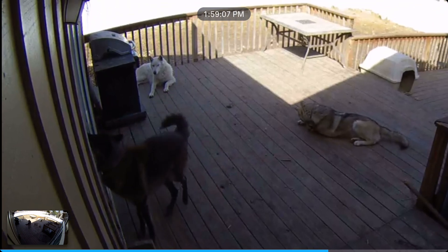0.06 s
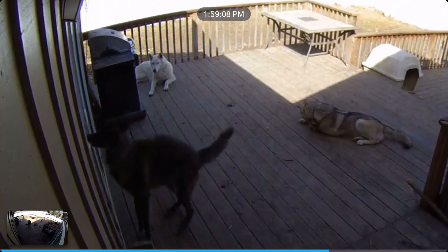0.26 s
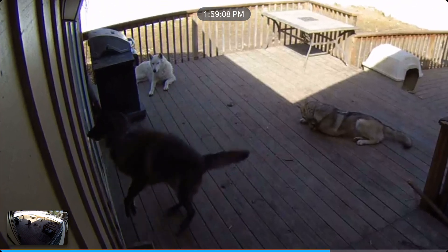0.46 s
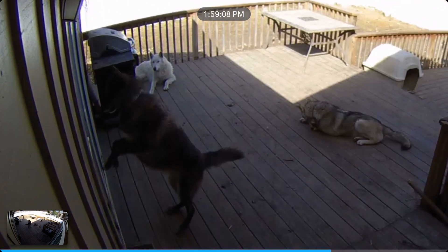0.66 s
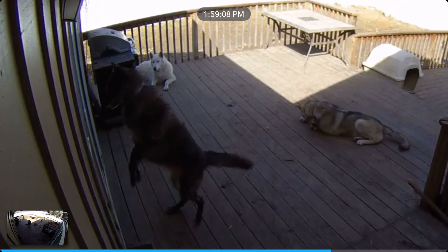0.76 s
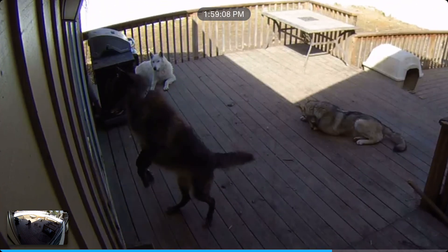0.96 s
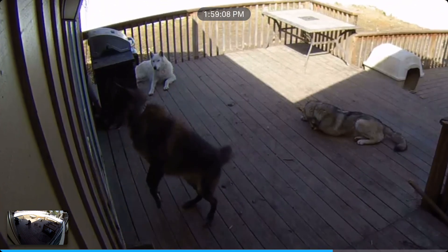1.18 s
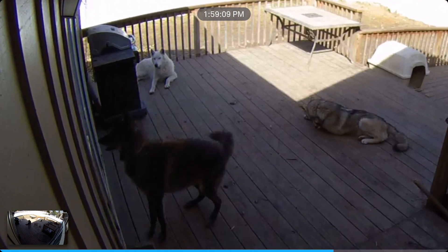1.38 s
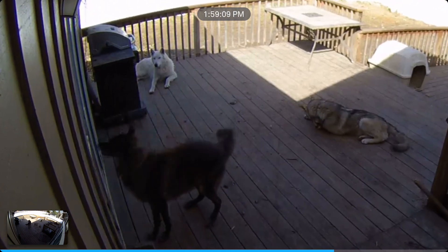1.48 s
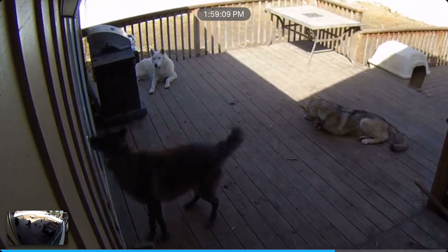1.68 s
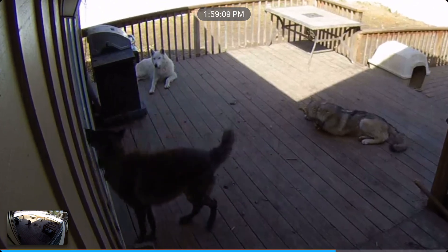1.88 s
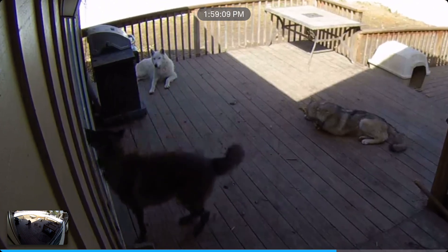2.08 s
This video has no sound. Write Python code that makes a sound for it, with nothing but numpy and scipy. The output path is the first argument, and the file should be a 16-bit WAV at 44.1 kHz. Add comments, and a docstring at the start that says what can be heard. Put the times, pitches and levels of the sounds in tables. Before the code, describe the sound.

Dog paws thump and claws click on a wooden deck, bumping and scratching a glass door.

```python
"""Paws knock on hollow wooden boards and claws tick: a dog on a deck rears up at a sliding glass door.
Three times a paw hits the door, which rattles in its frame. Claws drag over frame and glass and squeak
briefly, and the deck thumps as the dog drops back. The house wall gives a close echo, and a small,
dull microphone picks it all up over quiet outdoor air."""
import sys
import numpy as np
from scipy import signal
from scipy.fft import rfft, irfft, next_fast_len
from scipy.io import wavfile
from scipy.ndimage import uniform_filter1d

SR = 44100
rng = np.random.default_rng(int(sys.argv[2]) if len(sys.argv) > 2 else 0)


def file_out(sig):
    """Save sig as 16-bit WAV at sys.argv[1]."""
    # one column per channel
    cols = np.atleast_2d(sig).T
    # limit, then scale
    lim = np.clip(cols, -1, 1)
    pcm = np.round(lim * 32767).astype(np.int16)
    wavfile.write(sys.argv[1], SR, pcm)


N = 92610
T = np.arange(N) / SR
BLOW_SAMPLES = SR // 3   # room for one blow to die away


def from_db(db):
    """Turn decibels into a number to multiply by."""
    return 10 ** (np.asarray(db) / 20)


def add(out, start, sound):
    """Mix a sound in at a start time in seconds."""
    i = max(0, int(start * SR))
    out[i:i + len(sound)] += sound[:max(0, N - i)]


def colour(x, tone):
    """Make some frequencies louder and others softer, following a tone table."""
    size = 2 * next_fast_len(len(x))
    hz, db = np.transpose(tone)
    bin_hz = np.arange(size // 2 + 1) * SR / size
    log_gain = np.log(from_db(np.interp(np.log(bin_hz + 1), np.log(hz), db)))
    # a minimum-phase filter: nothing sounds before the blow that causes it
    cepstrum = irfft(log_gain)
    cepstrum[1:size // 2] *= 2
    cepstrum[size // 2 + 1:] = 0
    return irfft(rfft(x, size) * np.exp(rfft(cepstrum)))[:len(x)]


def dying(fade_s):
    """A smooth fade. Every fade time here is the time it takes to fall by 60 dB."""
    return np.exp(-np.log(1000) * T[:BLOW_SAMPLES] / fade_s)


def ring(hz, fade_s):
    """Something struck rings at one pitch and dies away."""
    return dying(fade_s) * np.sin(2 * np.pi * hz * T[:BLOW_SAMPLES])


def scatter(x, db, fade_s):
    """Follow a blow with its own cloud of chatter and close echoes."""
    cloud = rng.standard_normal(BLOW_SAMPLES) * dying(fade_s) * (1 - dying(0.017))
    return x + from_db(db) * signal.fftconvolve(x, cloud / np.linalg.norm(cloud))[:len(x)]


def at_level(x, db):
    """Scale a blow so that its loudest two milliseconds have this level."""
    return x * from_db(db) / np.sqrt(uniform_filter1d(x * x, size=88).max())


def porch(x, echo_db=-17, fade_s=0.53):
    """Sound lingers faintly as it bounces between wall, eaves and deck."""
    build_up = 1 - dying(0.08)[np.minimum(np.arange(N), BLOW_SAMPLES - 1)]
    tail = rng.standard_normal(N) * from_db(-60 * T / fade_s) * build_up
    return x + from_db(echo_db) * signal.fftconvolve(x, tail / np.linalg.norm(tail))[:N]


# tone of the outdoor air: (frequency [Hz], gain [dB])
AIR_TONE = [(18, -64.5), (30, -31.5), (182, -13), (257, -10), (339, -4), (408, -8.5), (551, -2.5),
            (727, -13.5), (855, -14), (1080, -26.5), (1710, -25.5), (2590, -18.5), (5060, -32), (5820, -35),
            (7500, -64), (9750, -81.5), (16500, -120)]
def air():
    """A quiet, steady outdoor hush."""
    noise = colour(rng.standard_normal(N), AIR_TONE)
    return from_db(-54.5) * noise / noise.std()


# tone of small, hard ticks on the boards: (frequency [Hz], gain [dB])
TICK_TONE = [(1000, -9.5), (2500, 2.5), (4500, -4), (5800, 6.5), (7000, -1.5), (8000, -24)]
def bright_ticks(clicks, cloud_db, fade_s):
    """Give clicks a short cloud of chatter and the bright sound of a claw on wood."""
    return colour(scatter(clicks, cloud_db, fade_s), TICK_TONE)


def shuffles(clicks_per_s=220):
    """Paws shifting on the gritty boards make tiny random ticks."""
    clicks = rng.random(N) < clicks_per_s / SR
    strength = from_db(6.5 * np.clip(rng.standard_normal(N), -2, 2))
    ticks = bright_ticks(clicks * strength, cloud_db=3, fade_s=0.027)
    return from_db(-72.5) * ticks / ticks.std()


# a claw catches on the glass: (time [s], length [s], pitch [Hz], level [dB])
GLASS_SQUEAKS = [(1.535, 0.0089, 2517, -34.5), (1.545, .026, 2566, -41.5), (1.555, 0.026, 3720, -45)]
def squeaks():
    """For a moment a claw's tiny slips on the glass lock into a wavering tone."""
    out = np.zeros(N)
    for start, length, hz, db in GLASS_SQUEAKS:
        t = T[:int(length * SR)]
        waver = uniform_filter1d(rng.standard_normal(BLOW_SAMPLES), size=60)
        pitch = hz * (1 + 0.039 * waver / waver.std())
        phase = 2 * np.pi * np.cumsum(pitch)[:len(t)] / SR
        swell = np.sin(np.pi * t / length)
        add(out, start, at_level(np.sin(phase) * swell, db))
    return out


# claws drag over the door: (time [s], length [s], relative level [dB])
CLAW_DRAGS = [(0.144, .04, -52.5), (0.351, 0.06, -53), (0.804, 0.047, -53), (0.886, 0.025, -50),
              (0.958, 0.051, -61), (1.154, 0.12, -58.5), (1.363, 0.057, -61.5), (1.487, 0.029, -47.5),
              (1.517, 0.036, -42.5), (1.572, 0.028, -51), (1.692, 0.027, -58), (1.769, 0.023, -55),
              (1.956, 0.057, -52)]
# notes the door frame rings at: (pitch [Hz], relative level [dB], fade time [s])
FRAME_NOTES = [(2170, -10.5, 0.087), (2533, -1.5, 0.026), (2670, 2, 0.031), (2930, -5, 0.048),
               (3770, -2, 0.03), (5750, -26.5, .012)]
# tone of the scraping: (frequency [Hz], gain [dB])
SCRAPE_TONE = [(800, 2.5), (1700, -6.5), (2500, 5.5), (3700, 5.5), (4400, 1.5), (5800, -7.5), (7500, -24)]
def scrapes(slips_per_s=4000, rise_s=0.0098, release_s=0.033):
    """A dragged claw sticks and slips in a stream of tiny clicks that make the frame sing."""
    slips = (rng.random(N) < slips_per_s / SR) * rng.choice([-1, 1], N)
    slips = slips * from_db(2 * rng.standard_normal(N))
    force = np.zeros(N)
    for start, length, db in CLAW_DRAGS:
        press = np.clip((T - start) / rise_s, 0, 1)
        ease_off = from_db(db - 7.5 * np.clip((T - start) / length, 0, 1))
        let_go = np.clip((start + length - T) / release_s + 1, 0, 1)
        force += press * ease_off * let_go
    frame = sum(from_db(db - 37) * ring(hz, fade_s) for hz, db, fade_s in FRAME_NOTES)
    frame[0] += 0.5   # the bare click, ahead of the ringing
    frame = colour(frame, SCRAPE_TONE)
    return from_db(4) * signal.fftconvolve(slips * force / slips.std(), frame / np.linalg.norm(frame))[:N]


# claw tips land: (time [s], relative level [dB], skid length [s])
CLAW_TICKS = [(0.081, -61, 0.0045), (.147, -64, 0.018), (0.234, -48, 0.0038), (0.263, -53, .006),
              (0.28, -58, 0.0028), (0.311, -52, 0.0046), (0.317, -60, 0.0043), (0.35, -58, .004),
              (0.367, -59.5, 0.028), (0.49, -55, 0.0065), (0.616, -52, 0.0074), (0.646, -59.5, 0.03),
              (0.712, -56, 0.0063), (0.749, -53.5, 0.0035), (0.7547, -47, 0.0048), (.786, -56, 0.0073),
              (0.798, -50.5, 0.0073), (0.811, -59, 0.018), (0.88, -54, 0.0067), (0.892, -56.5, 0.011),
              (0.95, -58.5, 0.019), (0.96, -52, 0.012), (.979, -55, 0.0048), (1.13, -78.5, 0.0027),
              (1.139, -63.5, 0.0072), (1.25, -60.5, 0.0053), (1.260, -60, 0.014), (1.326, -55, 0.00099),
              (1.366, -58.5, 0.0049), (1.401, -50, 0.0075), (1.414, -50, .003), (1.445, -58.5, 0.0068),
              (1.490, -44, 0.00072), (1.497, -51, 0.0065), (1.535, -58, 0.013), (1.585, -48, 0.0019),
              (1.589, -50.5, 0.0019), (1.603, -62, 0.0044), (1.691, -49.5, 0.002), (1.695, -47, 0.0032),
              (1.764, -62, 0.0089), (1.829, -43.5, 0.0024), (1.983, -63.5, 0.0032)]
def claws(rise_s=0.00086, release_s=0.0035, gain_db=3.04):
    """Each claw tip ticks as it lands and skids for a moment in gritty slips."""
    out, t = np.zeros(N), T[:BLOW_SAMPLES]
    for start, db, length in CLAW_TICKS:
        press = np.clip(t / rise_s, 0, 1)
        let_go = from_db(-60 * np.clip((t - length) / release_s, 0, 2))
        slips = rng.standard_normal(len(t)) * from_db(6 * rng.standard_normal(len(t)))
        tick = bright_ticks(slips * press * let_go, cloud_db=-12.5, fade_s=0.21)
        add(out, start, at_level(tick, db + gain_db))
    return out


# the dog's weight sinks into the deck: (time [s], thump level [dB], beam level [dB])
DECK_LANDINGS = [(0.314, -49.5, -53), (.362, -65, -47), (0.802, -70, -76), (0.892, -56, -46.5),
                 (0.984, -61, -45), (1.248, -62, -45), (1.499, -57.5, -59), (1.543, -53, -54.5),
                 (1.591, -43, -47.5), (1.696, -47.5, -52.5)]
def landings(thump_hz=76, beam_hz=245.5):
    """Under the dog's weight the deck thumps softly and the beams below it ring on."""
    out = np.zeros(N)
    for start, thump_db, beam_db in DECK_LANDINGS:
        thump = scatter(ring(thump_hz, 0.016), db=4.4, fade_s=0.19)
        beams = scatter(ring(beam_hz, 0.094), db=8.1, fade_s=0.42)
        add(out, start, at_level(thump, thump_db) + at_level(beams, beam_db))
    return out


# a paw hits the door: (time [s], relative rattle level [dB], pitch [Hz], thump level [dB])
DOOR_BLOWS = [(0.1449, -43, 2700, -80), (0.268, -34, 2500, -68), (0.2661, -28, 2130, -58),
              (0.279, -33.5, 2200, -55.5), (0.287, -43, 2300, -48.5), (0.358, -56.5, 2500, -48.5),
              (0.6065, -35.5, 2200, -80), (0.611, -31.5, 2000, -80.5), (0.626, -37.5, 2130, -83),
              (1.246, -45, 2300, -67), (1.248, -27.5, 2180, -56), (1.2598, -31, 1930, -37),
              (1.265, -46.5, 3080, -73.5), (1.277, -39.5, 2200, -68.5), (1.287, -46, 2400, -75.5),
              (1.298, -51, 2400, -76.5)]
# tone of the rattling door: (frequency [Hz], gain [dB])
DOOR_TONE = [(600, -15.5), (950, -8), (1300, -16.5), (1700, -6.5), (2000, -4), (2300, 0.5), (2650, 3.5),
             (3100, -8.5), (3700, -8), (4600, -13), (7000, -19.5)]
def door_rattles(clack_cycles=1.73, rise_s=0.0023, thump_hz=76, gain_db=0.5):
    """The loose door clacks against its frame while the glass gives a low thump."""
    out = np.zeros(N)
    rise = np.clip(T[:BLOW_SAMPLES] / rise_s, 0, 1)
    for start, db, hz, thump_db in DOOR_BLOWS:
        clack = scatter(ring(hz, clack_cycles / hz), db=6, fade_s=0.011) * rise
        rattle = colour(scatter(clack, db=-3.5, fade_s=0.13), DOOR_TONE)
        thump = scatter(ring(thump_hz, 0.0094), db=-4, fade_s=0.13)
        add(out, start, at_level(rattle, db + gain_db) + at_level(thump, thump_db))
    return out


# echoes off the deck and the house wall: (delay [s], gain [dB])
CLOSE_ECHOES = [(.0058, -19.5), (0.0138, -14.5)]
def echoed(x):
    """Nearby surfaces send a sound back a little later and softer."""
    t = T[:len(x)]
    return x + sum(from_db(db) * np.interp(t - delay, t, x, left=0) for delay, db in CLOSE_ECHOES)


# paws hit the boards: (time [s], relative level [dB], pitch [Hz], extra ringing [dB])
PAW_KNOCKS = [(.001, -35.5, 588, -8), (.082, -39.5, 640, -6.5), (0.2375, -30, 420, 2),
              (.268, -24, 518, 0.5), (.281, -28, 480, 3.5), (.2875, -31, 472, -22),
              (0.3129, -18.5, 632, -6.5), (.319, -21, 706, -0.5), (0.327, -43.5, 696, -1),
              (.357, -32.5, 390, -1), (0.37, -26.5, 480, -10.5), (.481, -36, 620, 24),
              (.489, -39.5, 620, -10), (.498, -39, 700, -2.5), (.612, -36, 634, -2), (.647, -33, 647, 4.5),
              (.660, -30, 717, -3.5), (.715, -44, 620, 12.5), (0.7553, -23.5, 630, 3),
              (.771, -28, 594, 0.5), (0.787, -27.5, 607, 12.5), (.802, -23.5, 670, -17),
              (0.819, -30.5, 534, 5), (.882, -26, 560, -5), (0.904, -29.5, 520, -4.5), (.957, -33, 578, -4),
              (.962, -26, 574, 6.5), (.968, -23, 575, 2), (.979, -28, 580, 22.5), (1.098, -39.5, 613, 8.5),
              (1.124, -39, 504, 15), (1.168, -38, 530, -0.5), (1.196, -40.5, 526, 2),
              (1.240, -39, 530, 5.5), (1.249, -23, 474, -16), (1.262, -26, 494, -2),
              (1.274, -30, 470, -16.5), (1.323, -36.5, 545, -1), (1.367, -37.5, 550, 1.5),
              (1.403, -25, 637, 1), (1.418, -27, 640, -2), (1.45, -22, 533, -3.5), (1.492, -24.5, 567, 1),
              (1.501, -28, 535, 26), (1.537, -34, 493, 6.5), (1.5883, -17.5, 667, -0.5),
              (1.603, -20.5, 643, -6.5), (1.693, -26, 603, -30), (1.699, -22.5, 670, -8),
              (1.831, -33, 537, 4), (1.958, -43, 500, 19), (1.976, -45.5, 573, 17), (2.093, -35, 581, 5)]
# notes the boards ring at: (pitch [Hz], relative level [dB], fade time [s])
BOARD_NOTES = [(265.2, -31, 0.28), (305.4, -18.5, .4), (341.6, -23.5, .3), (384, -30.5, 0.37),
               (450.6, -27.5, 0.31), (513, -19, .2), (583.6, -16.5, 0.22), (711.5, -18.5, .12),
               (806, -37, 0.039)]
# tone of the hollow boards: (frequency [Hz], gain [dB])
BOARD_TONE = [(30, -35.5), (80, -16), (170, -19), (260, -6), (340, 6), (430, -1), (520, 5.5), (620, 2),
              (740, 6), (860, -3), (1050, -10.5), (1400, -19.5), (2500, 3), (3700, 1.5), (5000, -9)]
# tone of sand crunching under a paw: (frequency [Hz], gain [dB])
GRIT_TONE = [(700, -9.5), (1300, -1.5), (2600, -2.5), (3800, -3.5), (5000, -17), (7000, -22.5)]
def paw_knocks(knock_cycles=6.46, wood_gain_db=1.5, grit_gain_db=-27):
    """Each paw gives a short hollow knock, sets the boards ringing and crunches a little grit."""
    out = np.zeros(N)
    for start, db, hz, ring_db in PAW_KNOCKS:
        ringing = np.zeros(BLOW_SAMPLES)
        for note_hz, note_db, fade_s in BOARD_NOTES:
            off_pitch_db = 6.5 * np.log2(note_hz / hz) ** 2   # notes far from the knock's pitch ring less
            spot_db = rng.normal(0, 2.1)   # each spot on the boards sounds a little different
            ringing += from_db(note_db - off_pitch_db + spot_db) * ring(note_hz, fade_s)
        knock = scatter(echoed(ring(hz, knock_cycles / hz)), db=ring_db + 4, fade_s=0.091)
        wood = colour(knock + from_db(ring_db - 2.5) * ringing, BOARD_TONE)
        add(out, start, at_level(wood, db + wood_gain_db))
        grit = rng.standard_normal(BLOW_SAMPLES) ** 3 * dying(0.1)   # cubing makes the noise crackle
        add(out, start, at_level(colour(grit, GRIT_TONE), db + grit_gain_db))
    return out


def scene():
    """Paws, door and claws over the outdoor air, in one channel."""
    deck = porch(paw_knocks()) + landings()
    door = porch(door_rattles() + scrapes() + squeaks())
    return (deck + door + claws() + shuffles() + air())[None]


def record(dry, low_cut_hz=34, high_cut_hz=7500):
    """The small microphone loses the deepest bass and the top of the treble."""
    thin = signal.sosfilt(signal.butter(2, low_cut_hz, "high", fs=SR, output="sos"), dry)
    return signal.sosfilt(signal.cheby1(10, 0.3, high_cut_hz, fs=SR, output="sos"), thin)


dry = scene()
out = record(dry)
file_out(out)
```